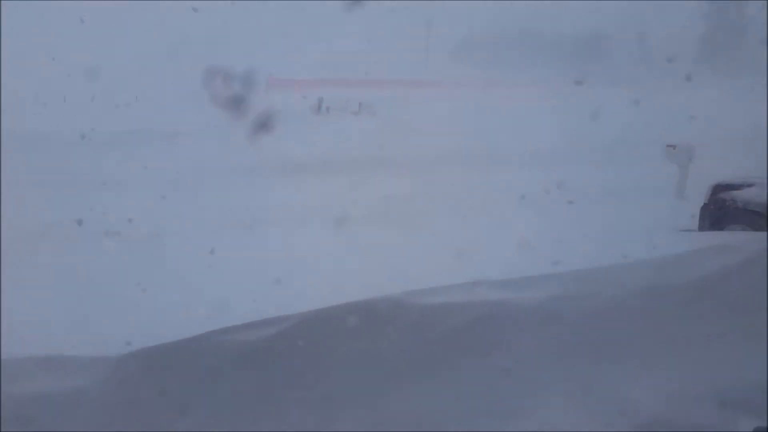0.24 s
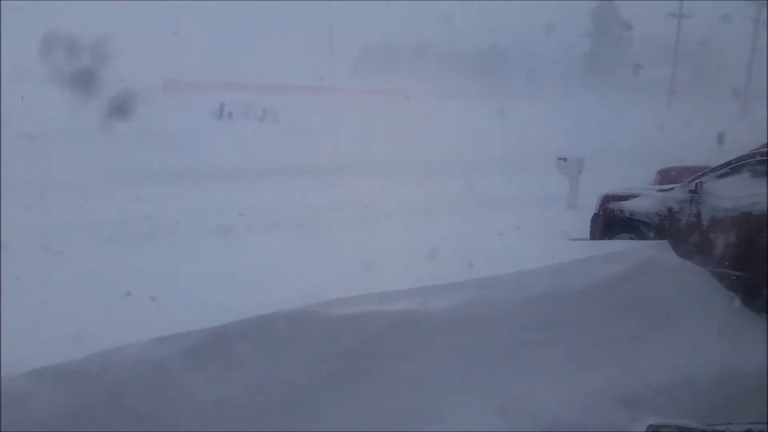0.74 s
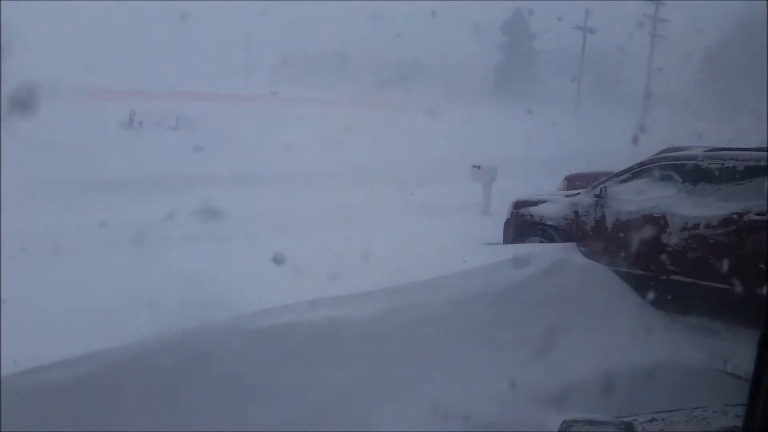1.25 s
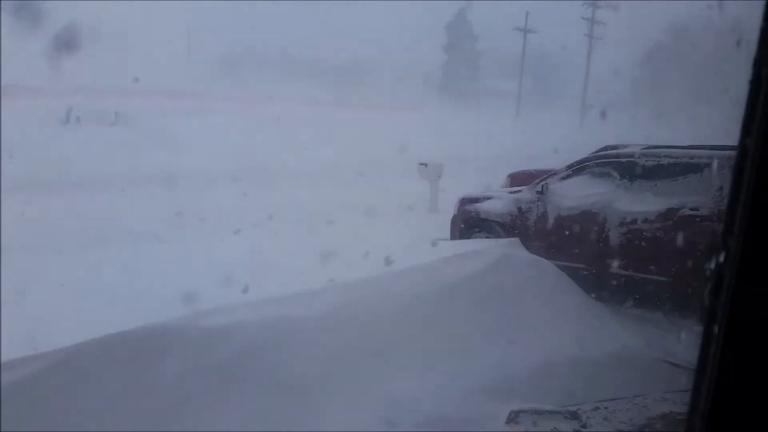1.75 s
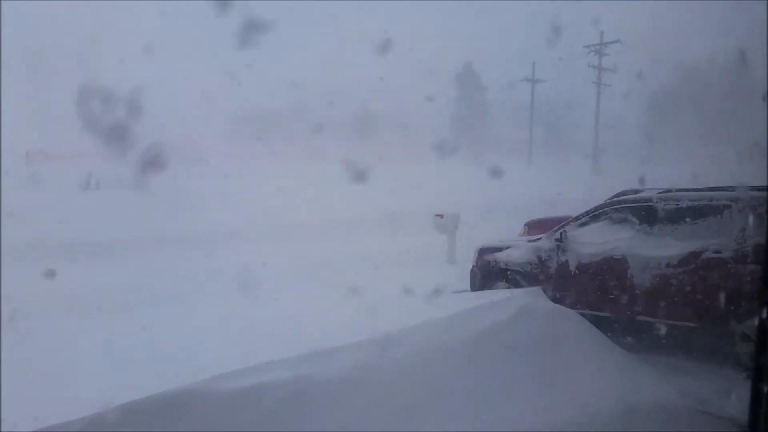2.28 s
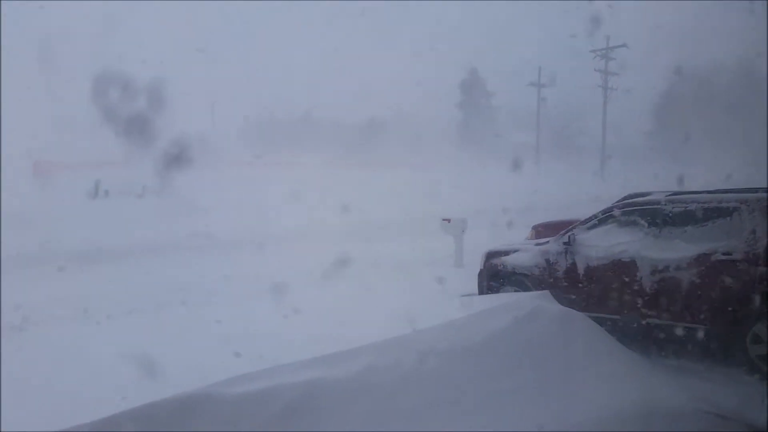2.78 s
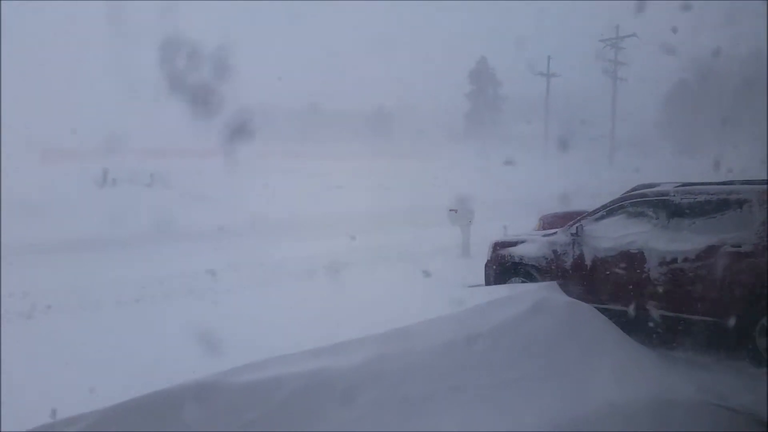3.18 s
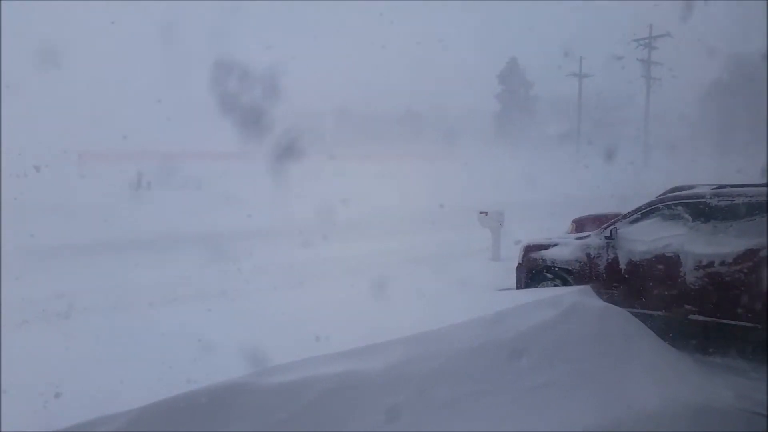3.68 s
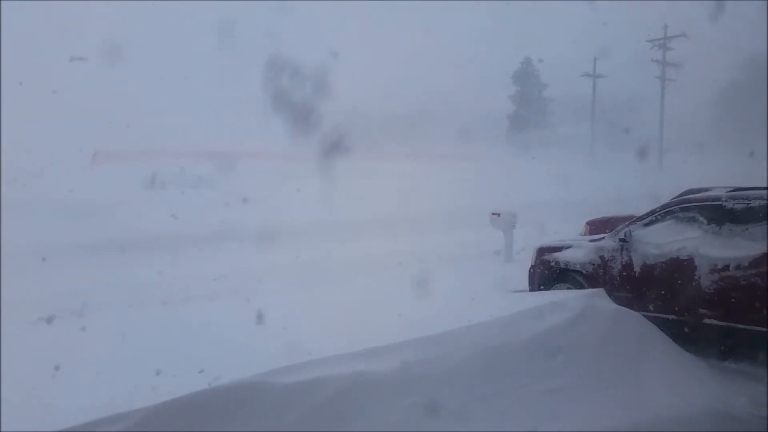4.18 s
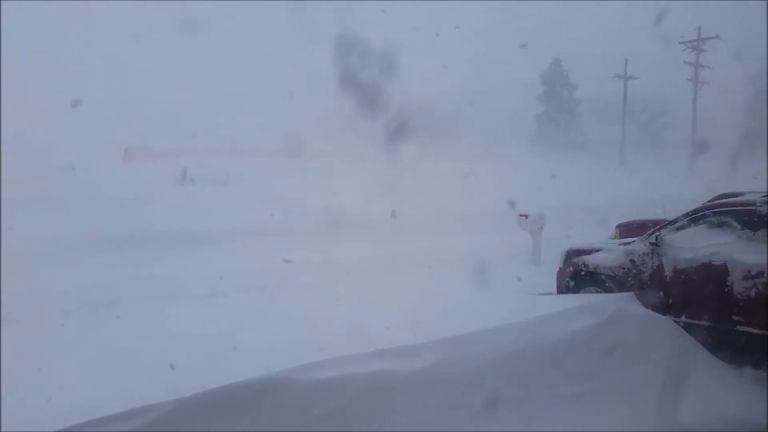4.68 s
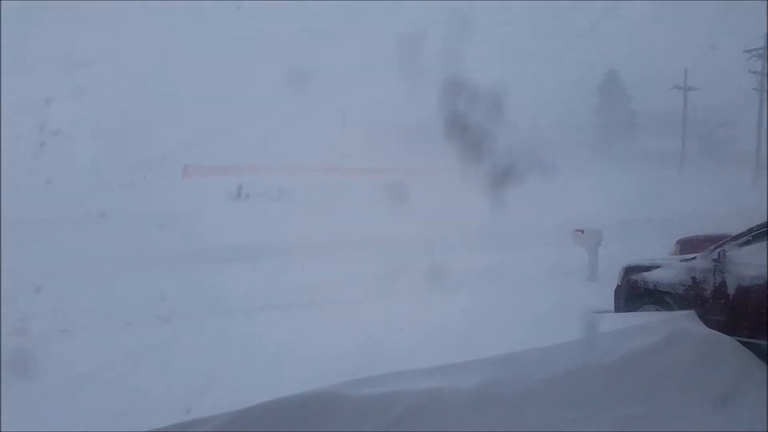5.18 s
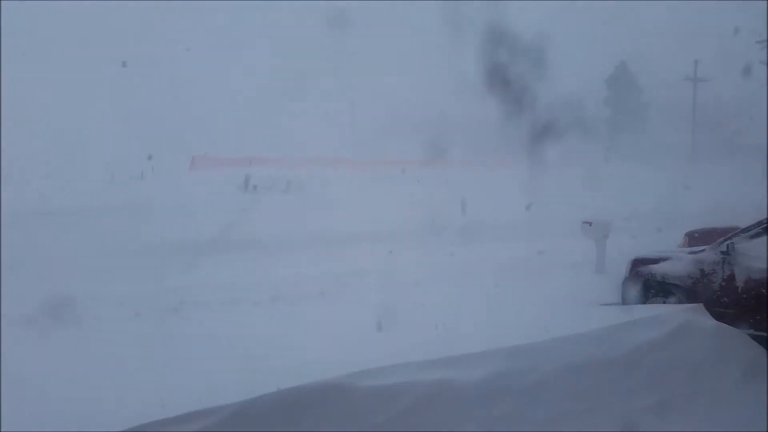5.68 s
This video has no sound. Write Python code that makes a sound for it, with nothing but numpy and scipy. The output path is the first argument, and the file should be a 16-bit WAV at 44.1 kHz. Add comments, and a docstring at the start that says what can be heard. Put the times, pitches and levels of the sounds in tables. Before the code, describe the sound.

A low, patchy wind rumble and a wavering motor hum run throughout. Over them, very close handling noise: dull knocks, short rubbing strokes and rapid stutters in the first second and a half, a brief pause, sparser bumps until four seconds, then almost only wind until sharp dry ticks near the end. Sheltered position just inside, small camera microphones.

```python
"""Just indoors, a hand-held camera faces a blizzard; its two microphone ports sit in the plastic case.
From the start wind, as patchy noise, rumbles and hisses at the ports over a dull noise bed, and a fan motor
drones in sines of wavering level against its mains hum. Almost at once the grip starts to slip: gliding
bends and ringing case modes make knocks, noise bursts make dry ticks, grainy noise makes rubs, and
even runs of slips make judders. The handling is densest in the first seconds and sparse by the end."""
import sys
import numpy as np
from scipy import signal
from scipy.fft import rfft, irfft, next_fast_len
from scipy.io import wavfile
from scipy.ndimage import uniform_filter1d, map_coordinates

SR = 44100
rng = np.random.default_rng(int(sys.argv[2]) if len(sys.argv) > 2 else 0)


def file_out(sig):
    """Save sig as 16-bit WAV at sys.argv[1]."""
    # one column per channel
    cols = np.atleast_2d(sig).T
    # limit, then scale
    lim = np.clip(cols, -1, 1)
    pcm = np.round(lim * 32767).astype(np.int16)
    wavfile.write(sys.argv[1], SR, pcm)


N = 261954


def amp(db):
    """Decibels to linear gain."""
    return 10 ** (np.asarray(db) / 20)


def unit(x):
    """Scale to an rms of 1 over all channels."""
    return x / np.sqrt(np.mean(x ** 2) + 1e-20)


def along(points, hz):
    """Read a curve of (frequency [Hz], value) points on a log axis."""
    f, v = np.transpose(points)
    return np.interp(np.log(hz + 1), np.log(f + 1), v)


def curves(rows):
    """One value per sample for each column after the time."""
    times, *columns = np.transpose(rows)
    return [np.interp(np.arange(N) / SR, times, column) for column in columns]


def wobble(rate):
    """A smooth random curve with rate knots a second."""
    knots = rng.standard_normal(int(N * rate / SR) + 4)
    return map_coordinates(knots, [np.arange(N) * rate / SR])


def filtered(x, response):
    """Shape x by a response given as a function of frequency in Hz."""
    size = next_fast_len(x.shape[-1] + 8192)
    spectrum = rfft(x, size) * response(np.fft.rfftfreq(size, 1 / SR))
    return irfft(spectrum, size)[..., :x.shape[-1]]


def sides(pan_db):
    """Left and right gains for a balance, left over right in dB."""
    return amp([pan_db / 2, -pan_db / 2])


# Balance of the wind between the ports: (frequency [Hz], left over right [dB])
WIND_BALANCE = [(60, 2), (150, -0.5), (380, 1.5), (950, 13.5), (2380, 12), (5980, 5), (15000, -3)]
# Left-right correlation of the wind before that balance: (frequency [Hz], correlation [-1 to 1])
WIND_LIKENESS = [(30, 0), (60, 1), (290, 1), (640, 0.57), (1400, 0)]


def rush(spectrum, patchy_db):
    """Turbulent air at two ports: noise with patches of random gain; the mean of the ports has rms 1."""
    bins = signal.stft(rng.standard_normal((2, N + 512)), nperseg=512)[2]
    patches = uniform_filter1d(rng.standard_normal(bins.shape[1:]), size=5, axis=0)  # across frequency
    patches = uniform_filter1d(patches, size=10, axis=1)  # across time
    pair = signal.istft(bins * amp(patchy_db * unit(patches)), nperseg=512)[1][:, :N]

    def mid_side(hz):
        angle = np.arccos(np.clip(along(WIND_LIKENESS, hz), -1, 1)) / 2
        return amp(along(spectrum, hz)) * [np.cos(angle), np.sin(angle)]

    mid, side = filtered(pair, mid_side)
    ports = np.array([mid + side, mid - side])
    ports = filtered(ports, lambda hz: sides(along(WIND_BALANCE, hz)))
    return ports / np.std(ports.mean(axis=0))


# Wind outside: (time [s], strength [dB])
GUSTS = [(0, 2.5), (1.65, 2.5), (1.8, 0.5), (2.4, -1.5), (4.6, -0.5), (5.94, 0.5)]
# Colours of the wind at the ports: (frequency [Hz], relative level [dB])
RUMBLE_COLOUR = [(5, -6.5), (26, -3.5), (42, 0.5), (60, 6), (100, -3.5), (140, 7), (190, -2.5), (300, -5.5),
                 (450, -22), (900, -60)]
HISS_COLOUR = [(200, -7.5), (400, -7.5), (600, -8), (1200, -14.5), (1700, -19.5), (2100, -16.5),
               (2950, -18), (3400, -28), (3800, -35.5), (4300, -26.5), (5600, -32), (7500, -54.5),
               (17000, -100)]
# Treble lifted by the microphone resonance, also heard in ticks and rubs:
# (frequency [Hz], relative level [dB])
TREBLE_COLOUR = [(5000, -52.5), (8000, -27), (10500, -14), (12500, -3), (13800, 2.5), (14600, 5),
                 (15200, 1), (16500, -6.5)]
RUMBLE_DB, HISS_DB, TREBLE_DB = -40.5, -55, -75  # at strength 0, before the wobbles
HISS_GROWS, TREBLE_GROWS = 0.22, 1.2  # dB per dB of strength


def wind():
    """Turbulence at the ports: rumble in lumps part shared and part each port's own, hiss and treble."""
    strength_db, = curves(GUSTS)
    rumble_db = RUMBLE_DB + strength_db
    hiss_db = HISS_DB + HISS_GROWS * strength_db
    treble_db = TREBLE_DB + TREBLE_GROWS * strength_db
    lumps_db = .9 * wobble(9) + 1.1 * np.array([wobble(14), wobble(14)])
    rumble = amp(rumble_db + lumps_db) * rush(RUMBLE_COLOUR, patchy_db=1.25)
    hiss = amp(hiss_db + 1.2 * wobble(5.1)) * rush(HISS_COLOUR, patchy_db=1.35)
    treble = amp(treble_db + .6 * wobble(16)) * rush(TREBLE_COLOUR, patchy_db=.8)
    return rumble + hiss + treble


# Motor lines: (shaft order, hum order, level before trim and wobble [dB])
MOTOR_LINES = [
    [1, 0, -44],
    [2, 0, -52],
    [3, 0, -43],
    [4, 0, -51],
    [0, 1, -41.5],
    [1, 1, -47],
]
# Whine beside them: (frequency [Hz], level before trim and wobble [dB])
MOTOR_WHINE = [(262.3, -55.5)]
SHAFT_HZ, HUM_HZ = 38.24, 119.9
IN_STEP_S = 4.425  # a moment when the third shaft order and the hum swell together
MOTOR_LAG_S = .0004  # the left port hears the motor later


def motor():
    """Shaft orders, mains hum and a sum tone; the third order beats with the hum five times a second."""
    t = np.arange(N) / SR - IN_STEP_S - np.array([[MOTOR_LAG_S], [0]])
    lines = [(shaft * SHAFT_HZ + hum * HUM_HZ, db) for shaft, hum, db in MOTOR_LINES] + MOTOR_WHINE
    tone = 0
    for hz, db in lines:
        level = amp(db + 2.4 * wobble(7.7))
        start_cycles = rng.random() * (abs(hz - HUM_HZ) > 10)  # only the beating pair keeps step
        tone = tone + level * np.cos(2 * np.pi * (hz * t + start_cycles))
    return amp(-0.48) * np.sqrt(2) * tone * sides(-.7)[:, None]


# Strokes of skin on the case: (time of full strength [s], hold [s], fade [dB/s],
# dull level [dB], bright level [dB], treble level [dB])
RUBS = [(0.358, 0.03, 150.5, -34.5, -55, -77), (0.399, 0.0083, 402, -28.5, -48.5, -73),
        (0.432, .27, 403, -41, -64, -87), (1.309, 0.036, 155, -42.5, -64.5, -78.5),
        (1.499, 0.11, 61, -46, -76.5, -65), (5.582, 0.042, 19, -59, -66.5, -65)]
# Dull part of the rubs, also the noise bed: (frequency [Hz], relative level [dB])
DULL_COLOUR = [(60, -28), (150, 3.5), (350, -0.5), (770, -16), (1800, -21), (3000, -35), (16000, -120)]
# Bright part of the rubs, also the middle of the dry ticks: (frequency [Hz], relative level [dB])
BRIGHT_COLOUR = [(600, -46.5), (1500, 0.5), (4500, 0.5), (6500, -6.5), (9000, -4.5), (11500, -21),
                 (17000, -39.5)]
RUB_RISE_DB_PER_S = 2500
DULL_BED_DB = -51.5  # a steady dull noise bed under the rumble


def rub():
    """Grainy friction under the fingers, in strokes that rise fast, hold and fade, over a dull noise bed."""
    grit = amp(3.63 * wobble(160)) * rng.standard_normal((3, 2, N))
    t = np.arange(N) / SR
    gains = np.zeros((3, N))  # dull, bright, treble
    for s, hold, fade, *level_db in RUBS:
        rise_db = RUB_RISE_DB_PER_S * (t - s)
        fade_db = fade * (s + hold - t)
        stroke = amp(np.minimum(0, np.minimum(rise_db, fade_db)))
        gains += amp(level_db)[:, None] * stroke
    gains[0] += amp(DULL_BED_DB)
    out = 0
    for gain, grains, colour in zip(gains, grit, (DULL_COLOUR, BRIGHT_COLOUR, TREBLE_COLOUR)):
        out = out + gain * unit(filtered(grains, lambda hz: amp(along(colour, hz))))
    return out


def crack(t, t60, spectrum):
    """A dying burst of coloured noise, unrelated at the two ports."""
    noise = filtered(rng.standard_normal((2, len(t))), lambda hz: amp(along(spectrum, hz)))
    return unit(noise) * amp(-60 * t / t60) * (1 - np.exp(-t / 0.00069))


# Bending of the case, one row for the left port and one for the right: (end pitch [Hz],
# extra cycles of the glide, signed gain, jerk gain [dB], thud gain [dB])
CASE_BEND = [(103.6, 0.51, -1.33, 2, -4), (95.5, 0.89, 0.91, 13, 8.5)]


def bend(t, thud_db):
    """High bending waves arrive first, so the swing glides down to the lowest mode."""
    end_hz, cycles, signed_gain, jerk_gain_db, thud_gain_db = np.transpose(CASE_BEND)[:, :, None]
    pitch = 1 + 0.093 * rng.standard_normal((2, 1))
    quick = t * amp(-.25 * thud_db)  # a slip with little thud is a harder, faster jerk
    glide = pitch * end_hz * t + cycles * (1 - np.exp(-pitch * quick / .0017))
    jerk = amp(jerk_gain_db - 60 * quick / 0.011)
    thud = amp(thud_gain_db + thud_db - 60 * t / 0.081)
    onset = (1 - np.exp(-quick / 0.001)) ** 2
    return signed_gain * (jerk + thud) * onset * np.sin(2 * np.pi * glide)


# Ringing modes of the case: (frequency before scatter [Hz], t60 at zero thud [s],
# left relative level [dB], right relative level [dB], level gained per thud [dB/dB])
CASE_MODES = [(567, 0.0049, -5.5, 6, -0.67), (1040, 0.0066, 6.5, 5.5, 0.58), (1406, 0.0075, 0, 2, 0.57),
              (1880, 0.0052, -2.5, 5, 0.03), (2620, 0.0051, -5.5, -10.5, 0.7),
              (4630, 0.0019, -12.5, -23.5, 0.73)]
RING_PER_THUD = 0.2  # dB of snap length for each dB of thud: hard jerks are drier
SNAP_LAG_S = 0.00017  # the snap reaches the left port later


def snap(t, thud_db, snap_db, bright_db):
    """The case modes ring as the skin lets go in a ragged flurry of a few milliseconds, not at once."""
    ring = 0
    for hz, t60, *side_db, per_thud in CASE_MODES:
        pitch = hz * np.exp(.05 * rng.standard_normal())
        tilt_db = bright_db * np.log2(hz / CASE_MODES[1][0]) + per_thud * thud_db
        scatter_db = 1.6 * rng.standard_normal((2, 1))
        size = amp(snap_db + tilt_db + 7.5 + np.array(side_db)[:, None] + scatter_db)
        fade = amp(-60 * t / (t60 * amp(RING_PER_THUD * thud_db)))
        onset = 1 - np.exp(-t / 0.00023)
        ring = ring + size * fade * onset * np.sin(2 * np.pi * pitch * (t - [[SNAP_LAG_S], [0]]))
    flurry = rng.standard_normal((1, SR // 100)) ** 3 * amp(-60 * t[:SR // 100] / 0.02)
    flurry[:, 0] = 38  # the first release is the hardest
    flurry /= np.linalg.norm(flurry, axis=1, keepdims=True)
    return signal.fftconvolve(ring, flurry, axes=1)[:, :len(t)]


# Slips of the grip, lone or in close runs: (time [s], jerk level [dB], thud re jerk [dB],
# snap re jerk [dB], snap brightness [dB/octave], tick re jerk [dB])
SLIPS = [(0.079, -39.5, 9, 0, -10, 6), (0.126, -32, 6, -13, -4, -11.5), (0.148, -30.5, 4, -19, -1, -36),
         (0.362, -25, 3.5, -9, -3, -2.5), (0.376, -30, 6, -23, 0, -35),
         (0.392, -22.5, 3, -14.5, -3.5, -32.5), (0.396, -31, 3, -10, -10, -35.5),
         (0.404, -26.5, -4.5, -5.5, 7.5, -35.5), (0.41, -28, 2, -11.5, 3, -28),
         (0.42, -20.5, -1, -17, -5, -36), (0.436, -35, 6, -25, -4, -27), (0.489, -30, 2, -18, -3, -35),
         (0.499, -24, 2.5, -9.5, -1, -3), (0.523, -23.5, 3, -18, -6, -44.5),
         (0.59, -18, -0.5, -21, 2, -12.5), (0.624, -16, -2.5, -12.5, -2.5, -17),
         (0.772, -27.5, 7.5, -12, -4, -5), (0.914, -37, -13, -8, 6.5, -30.5),
         (0.933, -15.5, -3.5, -10.5, 0.5, -17.5), (1.077, -17.5, 0.5, -21, 1, -19.5),
         (1.208, -23, -4.5, -8.5, 5, -14.5), (1.296, -21.5, -12, -8, 2, -25),
         (1.303, -24, 7, -16, -4, -7.5), (1.481, -17.5, -2, -19, 2, -20),
         (1.513, -19, -0.5, -23.5, 4, -27.5), (1.535, -22.5, 3, -20.5, -5, -25.5),
         (1.552, -24.5, 2.5, -17.5, -3.5, -22.5), (1.570, -26, 6, -17.5, -10, -28),
         (1.589, -24, 3, -18, -0.5, -20.5), (1.615, -24.5, 3.5, -20, -1, -25.5),
         (1.632, -25.5, 8, -24.5, -2, -24.5), (1.665, -16, -3, -19.5, -2, -24),
         (2.381, -24.5, -5, -31, 7, -39), (2.451, -18.5, -10, -20.5, -2.5, -49.5),
         (2.504, -33, 3.5, -29, 0, -38), (2.645, -21.5, -6.5, -22.5, 1.5, -24.5),
         (2.719, -21.5, -6, -14, 0, -35), (2.779, -28.5, -3.5, -13, -0.5, -32.5),
         (3.234, -15.5, -13.5, -19.5, 2.5, -31.5), (3.559, -16.5, -10, -13.5, 5.5, -21.5),
         (3.957, -21.5, -15, -17, 4, -26), (4.703, -34.5, 4, -10, -4, -42.5),
         (5.657, -46, 7, -3.5, -6.5, -34)]


def slips():
    """Each slip of the grip bends and snaps the case, mostly beside the right port."""
    out, t = np.zeros((2, N + SR)), np.arange(SR // 8) / SR
    for s, jerk_db, thud_db, snap_db, bright_db, tick_db in SLIPS + judder():
        knock = bend(t, thud_db) + snap(t, thud_db, snap_db, bright_db)
        tick_gain = amp(tick_db + np.array([[-9], [3]]))  # left, right
        knock += tick_gain * crack(t, 0.0084, TREBLE_COLOUR)
        start = round((s + .0017) * SR)
        out[:, start:][:, :len(t)] += amp(jerk_db) * knock
    return out[:, :N]


# Dry ticks on the case: (time [s], level [dB], middle re treble [dB], t60 [s])
TICKS = [(0.202, -55.5, 2.5, 0.037), (1.413, -51, -3.5, 0.017), (1.526, -43.5, -17, 0.017),
         (2.353, -54.5, -13.5, 0.046), (3.205, -54.5, -18, 0.022), (4.039, -51, -13, 0.014),
         (4.882, -51, -26, 0.026), (5.56, -42, -0.5, 0.033), (5.570, -36, -9.5, 0.057),
         (5.729, -49, -16, 0.04), (5.748, -55, -11, 0.03)]
TICK_PAN_DB = -7  # left over right


def ticks():
    """Dry ticks on the case: short treble bursts, with a middle that leans left."""
    out, t = np.zeros((2, N + SR)), np.arange(SR // 4) / SR
    for s, db, middle_db, t60 in TICKS:
        treble = crack(t, t60, TREBLE_COLOUR)
        middle = amp(middle_db) * crack(t, t60, BRIGHT_COLOUR) * sides(20.0)[:, None]
        out[:, round(s * SR):][:, :len(t)] += amp(db) * (treble + middle) * sides(TICK_PAN_DB)[:, None]
    return out[:, :N]


# Even runs of slips: (first time [s], last time [s], rate [slips/s], jerk level before scatter [dB],
# snap re jerk before scatter [dB], tick re jerk before scatter [dB])
JUDDERS = [(0.64, 0.681, 75, -21, -19.5, -28.5), (0.7, 0.721, 48, -26, -18, -19.5),
           (0.957, 1.01, 55, -23, -19, -28.5), (1.324, 1.396, 43, -24.5, -20, -26.5)]
# Spread from slip to slip: (firmness [dB], snap [dB], tick [dB])
JUDDER_SCATTER = (1, 1, 11.5)
JUDDER_THUD_DB = 2.5  # re jerk, at middling firmness
JUDDER_TILT_DB = -6  # snap brightness, dB per octave


def judder():
    """Even runs as rows like SLIPS; a firmer slip has a weaker jerk under the same thud."""
    rows = []
    for first, last, rate, jerk_db, snap_db, tick_db in JUDDERS:
        times = np.linspace(first, last, round((last - first) * rate) + 1)
        scatter = rng.standard_normal((len(times), len(JUDDER_SCATTER))) * JUDDER_SCATTER
        for s, (firm, snap_shift, tick_shift) in zip(times, scatter):
            rows.append((s, jerk_db - firm, JUDDER_THUD_DB + firm, snap_db + firm + snap_shift,
                         JUDDER_TILT_DB, tick_db + tick_shift))
    return rows


def scene():
    """All sources as heard at the two ports."""
    return wind() + motor() + rub() + slips() + ticks()


def record(dry):
    """The camera keeps nothing above its band limit of 15900 Hz."""
    return filtered(dry, lambda hz: hz < 15900)


dry = scene()
out = record(dry)
file_out(out)
```